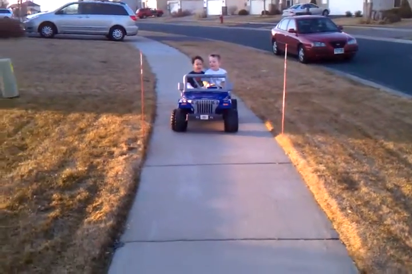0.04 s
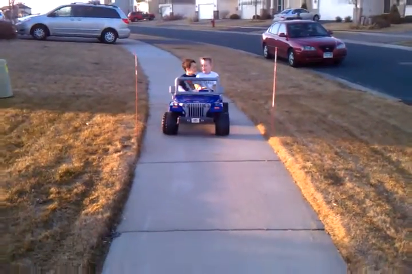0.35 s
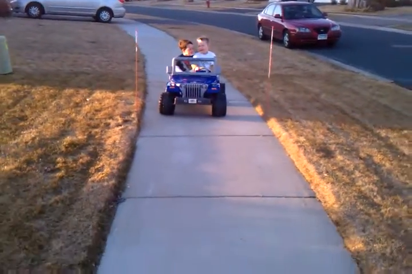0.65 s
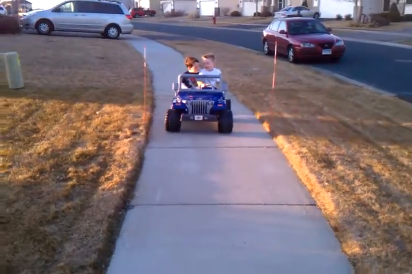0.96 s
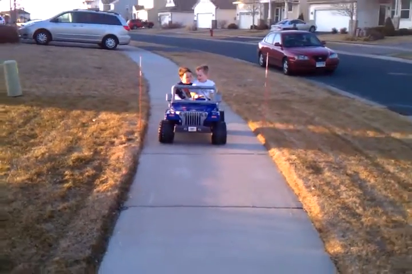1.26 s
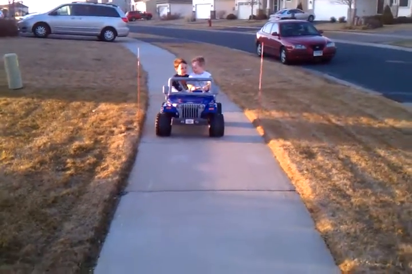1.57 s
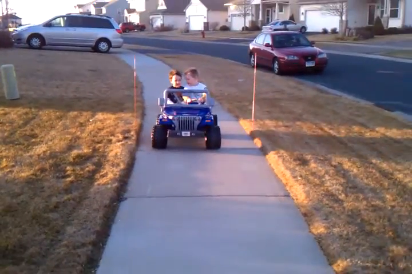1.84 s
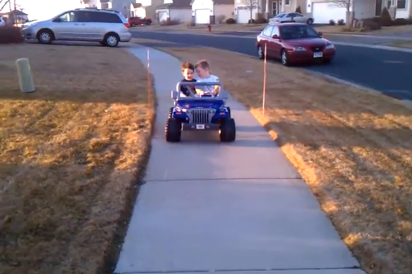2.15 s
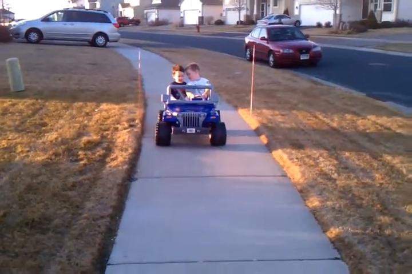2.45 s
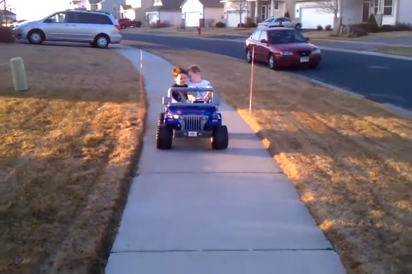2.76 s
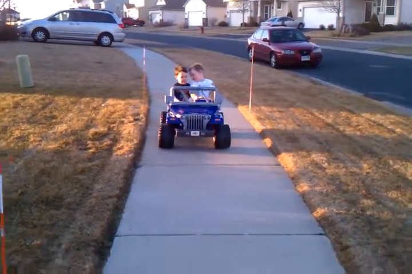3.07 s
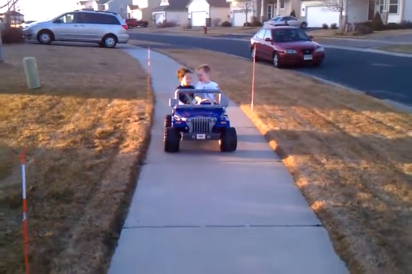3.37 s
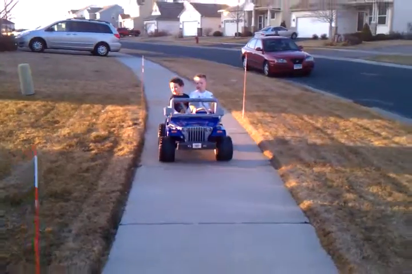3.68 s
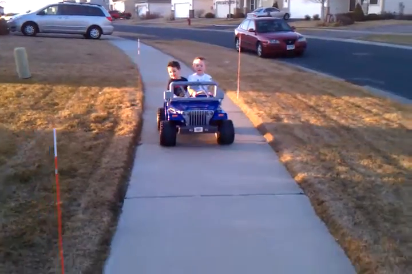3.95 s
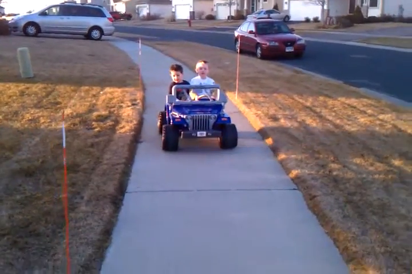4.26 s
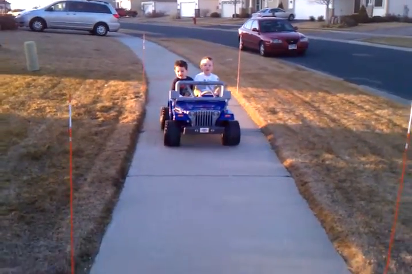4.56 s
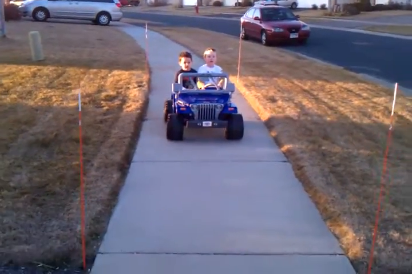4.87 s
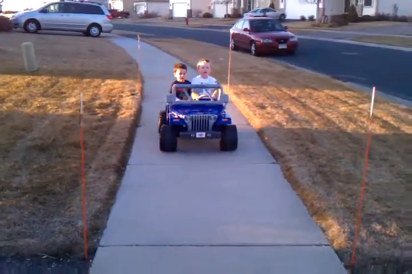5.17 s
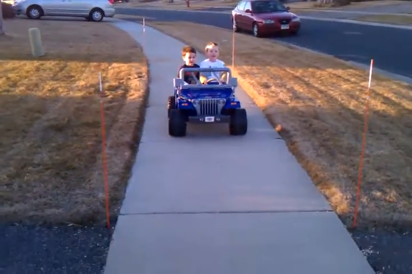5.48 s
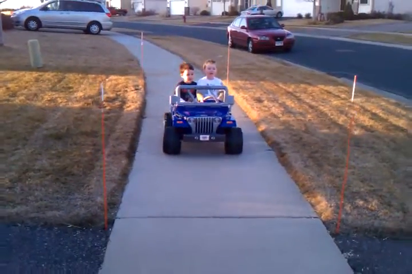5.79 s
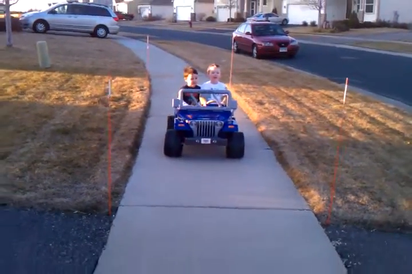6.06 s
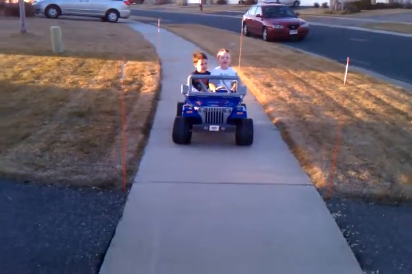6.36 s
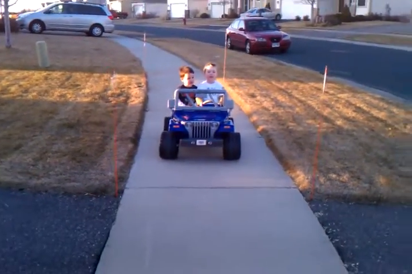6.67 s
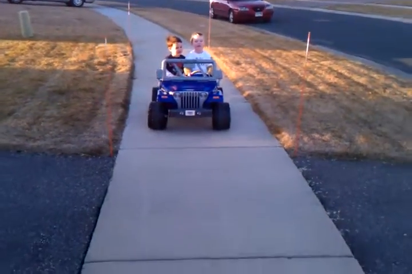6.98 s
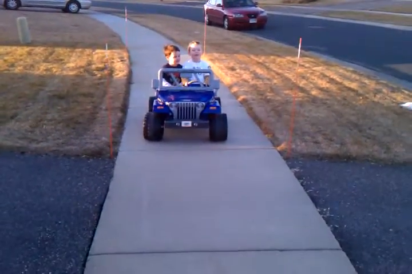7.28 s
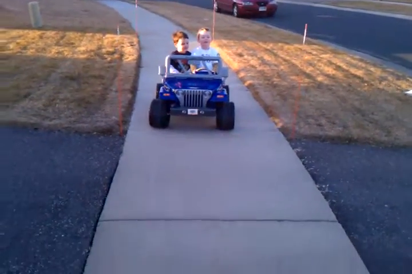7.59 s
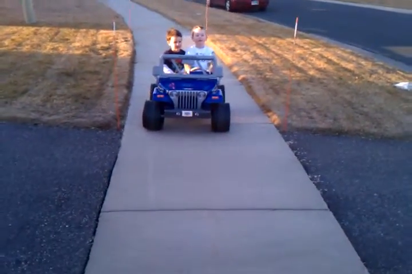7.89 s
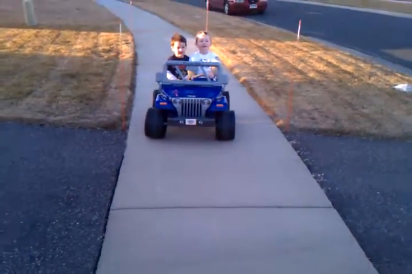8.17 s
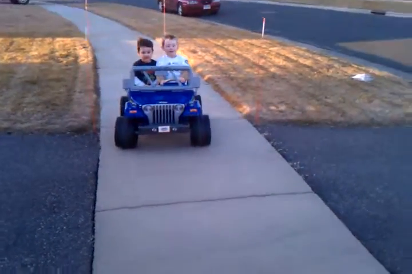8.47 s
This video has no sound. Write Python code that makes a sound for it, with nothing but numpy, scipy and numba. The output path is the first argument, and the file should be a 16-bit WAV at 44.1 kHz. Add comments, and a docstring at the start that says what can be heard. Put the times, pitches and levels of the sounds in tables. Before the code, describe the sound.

A battery ride-on toy car rolls along a concrete pavement throughout, heard on a hand-held microphone outdoors. Its motors and plastic gears make a rough, throbbing whine, while hollow wheels crunch grit and clack irregularly on small stones. Faint, distant traffic lies underneath. From the start until about 3.7 seconds, wind buffets the microphone with low rumbles, sharp slaps and brief hoarse whistles, overloading it and making the car dip in level. A short lull follows, and the car comes through. The gusts return at about 4.4 seconds, and one long gust hums from 5.2 to 5.7 seconds, rising and then falling in pitch. From about 6 seconds the wind eases to occasional soft puffs. The whine and crackling wheels stay in front, growing slightly louder just before the end at about 8.7 seconds.

```python
"""A concrete pavement on a windy day, a hand-held microphone, traffic in the distance. From the start a
battery ride-on toy car creeps closer: two plastic gearboxes whine, hollow wheels crunch grit and clack
on stones. For the first 3.7 s gusts buffet, slap and whistle across the microphone port, overload it
and make the gain control duck the car. After a lull they return, and one long gust hums from 5.2 to
5.7 s. Then the wind eases and leaves the car in front."""
import sys
import numpy as np
from scipy import signal
from scipy.fft import rfft, irfft
from scipy.io import wavfile
from scipy.ndimage import uniform_filter1d
from numba import njit

SR = 44100
rng = np.random.default_rng(int(sys.argv[2]) if len(sys.argv) > 2 else 0)


def to_wav(s):
    """Save 16-bit WAV."""
    ch = np.atleast_2d(s).T  # columns
    pcm = np.round(np.clip(ch, -1, 1) * 32767)  # PCM
    wavfile.write(sys.argv[1], SR, pcm.astype(np.int16))


N = 385037
T = np.arange(N) / SR


def undb(db):
    """Decibels to gain."""
    return 10 ** (np.asarray(db) / 20)


def unit(x):
    """Scale to rms 1."""
    return x / np.sqrt(np.mean(x ** 2))


def curves(table):
    """Each column of a table, joined by straight lines in time."""
    times, *columns = np.transpose(table)
    return [np.interp(T, times, column) for column in columns]


def noise():
    """White noise."""
    return rng.standard_normal(N)


def walk(rate):
    """A random drift of rms 1 that takes a new course rate times a second."""
    return unit(np.interp(T * rate, np.arange(N // 10), rng.standard_normal(N // 10)))


@njit
def svf(x, tuning, damping):
    """State-variable band-pass whose centre and width may move."""
    y, band_state, low_state = np.empty(len(x)), 0., 0.
    for i in range(len(x)):
        v = (band_state + tuning[i] * (x[i] - low_state)) / (1 + tuning[i] * (tuning[i] + damping[i]))
        band_state = 2 * v - band_state
        low_state += 2 * tuning[i] * v
        y[i] = damping[i] * v
    return y


def band(x, hz, width):
    """One resonance, gain 1 at its centre."""
    return svf(x, np.tan(np.pi * hz / SR) * np.ones(N), width / hz * np.ones(N))


def ring(x, modes):
    """A body's resonances, driven together."""
    return sum(undb(db) * band(x, hz, width) for hz, width, db in modes)


# Spectrum of the distant background: (frequency [Hz], relative level [dB])
AMBIENCE_SPECTRUM = [(30, 0), (110, -15), (200, -5), (300, 0), (430, -9), (700, -1), (1000, -9.5),
                     (1700, -12.5), (4000, -15), (6500, -38), (8000, -39.5)]
def ambience():
    """Traffic and wind far off in the neighbourhood, a slowly drifting bed of noise."""
    hz, db = np.transpose(AMBIENCE_SPECTRUM)
    bin_hz = np.arange(N // 2 + 1) * SR / N
    colour = undb(np.interp(np.log(bin_hz + 1), np.log(hz), db))
    return unit(irfft(rfft(noise()) * colour, N)) * undb(-35.5 + walk(0.56))


# Low buffeting right on the microphone: (time [s], level [dB])
BREEZE_LEVELS = [(0, -13.5), (.35, -23), (.55, -16.5), (.75, -17), (1.2, -19.5), (1.31, -26.5), (1.45, -19),
                 (1.67, -22), (1.8, -14.5), (1.99, -22.5), (2.21, -26), (2.35, -19.5), (2.48, -25),
                 (2.78, -19.5), (2.91, -20.5), (3.15, -15), (3.5, -22.5), (3.7, -26.5), (3.85, -42.5),
                 (4.35, -46.5), (4.42, -16.5), (4.52, -26), (4.7, -24.5), (5.05, -29), (5.72, -23),
                 (5.8, -19.5), (5.92, -32.5), (6.06, -28), (6.3, -41), (6.65, -33.5), (6.8, -45.5),
                 (7.1, -38.5), (7.7, -54), (7.95, -28.5), (8.2, -46.5), (8.73, -41)]
def breeze(puff_db=5.5, strongest_db=8.0):
    """Slow eddies thump the microphone in short, uneven puffs; stronger puffs reach higher in pitch."""
    db = curves(BREEZE_LEVELS)[0] + np.minimum(puff_db * walk(40), strongest_db)
    hz = np.clip(68 * undb(0.27 * (db + 29.5)), 30, 400)
    rumble = band(band(noise(), hz, 3.5 * hz), hz, 2.7 * hz)
    return unit(rumble / np.sqrt(hz)) * undb(db)


def gearbox(mesh_hz, wander=.02, jitter=.09, rattle=0.26, throb_db=3.5):
    """Loose plastic teeth strike unevenly and scrape; the level throbs as the load changes."""
    phase = np.cumsum(mesh_hz * (1 + wander * walk(7) + jitter * walk(300))) / SR
    strikes = np.diff(np.floor(phase), prepend=0) * undb(3.8 * walk(500))
    scrape = rattle * noise() * np.exp(-(phase % 1) / 0.59)
    return (strikes + scrape) * undb(-throb_db * walk(25))


# Resonances of the gearbox housing: (frequency [Hz], width [Hz], gain [dB])
HOUSING_MODES = [(330, 82, -4), (520, 83, -1), (749, 130, 2.5), (1260, 280, -2), (2040, 680, -6),
                 (2330, 250, -7.5)]
def gear_whine(teeth):
    """The tooth strikes ring the plastic housing."""
    return unit(ring(teeth, HOUSING_MODES))


# Resonances of the motor mounts: (frequency [Hz], width [Hz], gain [dB])
MOUNT_MODES = [(2110, 150, -5), (2560, 150, 0), (2780, 70, 1), (3220, 110, -1), (3380, 110, -8)]
def motor_whirr(teeth):
    """The same strikes ring the motor mounts in narrow, high bands."""
    return unit(sum(undb(db) * band(band(teeth, hz, width), hz, 3 * width)
                    for hz, width, db in MOUNT_MODES))


def grit(rate, spread_db):
    """Grains of sand crushed at random, about rate a second, a few larger than the rest."""
    hit = rng.random(N) < rate / SR
    size = undb(spread_db * np.minimum(rng.exponential(size=N), 4))
    return unit(hit * size * noise())


# Resonances of a hollow plastic wheel: (frequency [Hz], width [Hz], gain [dB])
WHEEL_MODES = [(1250, 260, 9.5), (2100, 110, 2), (2580, 810, 16.5), (2860, 220, 9), (3166, 260, -1.5),
               (4200, 450, -3.5), (5160, 1100, 1), (5780, 240, -2.5)]
def wheel_crunch():
    """Grit crushed on the concrete rings the wheels; the level flickers."""
    return unit(ring(grit(rate=2800, spread_db=1.5), WHEEL_MODES)) * undb(walk(22) + 2.5 * walk(130))


def ticks(rate=22, spread_db=2.0, decay_s=0.0029):
    """Small stones snap under the treads, each in a brief bright crackle."""
    hit = rng.random(N) < rate / SR
    size = undb(spread_db * np.minimum(rng.exponential(size=N), 2))
    envelope = signal.fftconvolve(hit * size, np.exp(-T[:2000] / decay_s))[:N]
    return envelope * unit(band(grit(rate=25000, spread_db=15.0), 4800, 5000))


# Reflections under the car: (delay [s], gain [dB])
UNDERBODY_BOUNCES = [(.00122, -11.5), (.00153, -4.5)]
def shell(x, sway=0.034):
    """Sound bounces between the body and the pavement; the paths waver as the car rocks."""
    return x + sum(undb(db) * np.interp(T - delay * (1 + sway * walk(3.9)), T, x)
                   for delay, db in UNDERBODY_BOUNCES)


# The car's approach, in relative levels: (time [s], whine [dB], crunch [dB], whirr [dB])
APPROACH_LEVELS = [(0, -27, -26, -27.5), (1.2, -36, -32.5, -31.5), (2, -35, -38.5, -32.5),
                   (3, -26.5, -31.5, -33), (3.6, -25.5, -31.5, -30.5), (4.05, -26, -28, -31),
                   (4.2, -36, -31, -34), (5, -24.5, -27, -30.5), (6.25, -30.5, -29, -32.5),
                   (6.6, -28, -30.5, -32), (7.4, -26.5, -29.5, -31), (7.75, -27, -31.5, -33),
                   (8.1, -29.5, -30, -31), (8.35, -25, -26, -27), (8.73, -23.5, -28.5, -28)]
def car(echo_s=.07, echo_db=-20):
    """Two geared motors and hard wheels under one shell, with a faint echo off the house fronts."""
    whine_db, crunch_db, whirr_db = curves(APPROACH_LEVELS)
    teeth = gearbox(mesh_hz=654) + gearbox(mesh_hz=729)
    whine = gear_whine(teeth) * undb(whine_db)
    whirr = motor_whirr(teeth) * undb(whirr_db)
    rolling = (wheel_crunch() + undb(-2.5) * ticks()) * undb(crunch_db)
    direct = undb(-5) * (shell(whine + rolling + clacks()) + whirr)
    return direct + undb(echo_db) * np.interp(T - echo_s, T, direct, left=0)


# Gusts at the microphone port: (time [s], length [s], level [dB], nominal pitch [Hz])
PORT_GUSTS = [(0.02, 0.013, 5.5, 1153), (0.046, 0.0065, -12.5, 460), (0.064, 0.3, -4, 624),
              (0.361, 0.062, -14.5, 260), (0.427, 0.066, -6, 541), (0.634, 0.067, -4.5, 628),
              (0.712, 0.073, -3, 532), (0.793, 0.1, -5.5, 535), (0.901, 0.039, -8.5, 760),
              (0.975, 0.073, -12.5, 575), (1.062, 0.022, -11.5, 342), (1.099, 0.0054, -12, 405),
              (1.121, 0.01, -8.5, 430), (1.141, 0.074, -14.5, 379), (1.214, 0.025, -7.5, 545),
              (1.251, 0.012, -8, 620), (1.344, 0.075, -4.5, 480), (1.425, 0.067, -5.5, 409),
              (1.502, 0.0085, -9.5, 480), (1.531, 0.032, -10.5, 313), (1.592, 0.006, -7, 419),
              (1.603, 0.033, -15.5, 203), (1.704, 0.04, -10.5, 415), (1.758, 0.013, -10, 228),
              (1.783, 0.062, -12, 323), (1.887, 0.028, -6.5, 504), (1.943, 0.027, -12, 400),
              (2.011, 0.021, -10.5, 460), (2.047, 0.036, -13, 398), (2.123, 0.055, -8.5, 469),
              (2.227, 0.0075, -13.5, 406), (2.264, 0.011, 0.5, 507), (2.276, 0.058, -5, 419),
              (2.341, 0.012, -2, 505), (2.362, 0.041, -10.5, 485), (2.431, 0.02, -10.5, 430),
              (2.492, 0.016, -20, 242), (2.529, 0.034, -15.5, 359), (2.57, 0.036, -7.5, 464),
              (2.648, 0.034, -18.5, 263), (2.738, 0.027, -17.5, 240), (2.784, 0.033, -10.5, 361),
              (2.825, 0.028, -8.5, 524), (2.965, 0.084, -10, 606), (3.068, 0.0085, -9, 613),
              (3.073, 0.071, -10.5, 397), (3.142, 0.069, -4.5, 527), (3.218, 0.081, -3, 693),
              (3.309, 0.027, -7.5, 425), (3.373, 0.03, -15.5, 394), (3.42, 0.023, -4.5, 423),
              (3.444, 0.033, -10, 550), (3.485, 0.045, -5, 610), (3.549, 0.011, -16.5, 366),
              (3.597, 0.0037, -7, 347), (3.677, 0.041, -22, 204), (4.067, 0.009, -26, 141),
              (4.217, 0.023, -31.5, 165), (4.409, 0.054, -7, 633), (4.466, 0.029, -16, 243),
              (4.551, 0.028, -12, 734), (4.639, 0.036, -14, 242), (4.676, 0.014, -8.5, 280),
              (4.725, 0.011, -5, 446), (4.74, 0.078, -8, 523), (4.872, 0.013, -8.5, 554),
              (4.89, 0.03, -19.5, 354), (4.921, 0.027, -6, 680), (4.944, 0.045, -9.5, 696),
              (5.677, 0.024, -15, 314), (5.764, 0.027, -5, 530), (5.786, 0.033, -11, 570),
              (5.826, 0.021, -15, 325), (6.028, 0.03, -21.5, 236), (6.058, 0.025, -14, 340),
              (6.168, 0.048, -23.5, 210), (6.406, 0.037, -24, 194), (6.602, 0.036, -31.5, 147.5),
              (6.683, 0.025, -25, 182), (6.899, 0.017, -25.5, 230), (7.09, 0.016, -32.5, 141.4),
              (7.404, 0.027, -32, 237), (7.909, 0.029, -25.5, 176), (7.965, 0.037, -22.5, 167),
              (8.016, 0.014, -23, 128.4), (8.072, 0.038, -34, 162)]
def gust_flow(rise_s=0.00081, rise_share=0.0071, fall_s=0.0028, growth_db=1.4, weak_db=-15):
    """Envelope, level (dB) and pitch (Hz) of the flow: each gust sets in, grows a little and drops."""
    total = np.full(N, 1e-4)
    db_sum, hz_sum = total * -22, total * 250  # idle flow between the gusts
    for start, length, db, hz in PORT_GUSTS:
        span = slice(max(int((start - .08) * SR), 0), int((start + length + .08) * SR))
        age = T[span] - start
        soft_s = .0005 * max(weak_db - db, 0)  # weak gusts come and go softly
        rise = 1 + np.tanh(age / (rise_s + rise_share * length + soft_s))
        fall = 1 - np.tanh((age - length) / (fall_s + soft_s))
        swell = rise * fall / 4
        total[span] += swell
        db_sum[span] += swell * (db + growth_db * np.clip(age / length - .5, -1, 1))
        hz_sum[span] += swell * hz
    return total, db_sum / total, hz_sum / total


# Roughness of the flow at the port: (time [s], turbulence [ratio, roughly bandwidth / pitch])
PORT_TURBULENCE = [(0, 1.22), (2.7, 1.01), (2.85, 0.9), (3.0, 0.55), (3.1, 0.9), (3.3, 0.73), (3.7, 0.33),
                   (4.42, 0.91), (4.56, 0.35), (4.7, 0.85), (4.85, 1), (4.95, 0.37), (5.78, 0.93),
                   (8.73, 1.4)]
def gusts(droop=0.36, surge_db=1.5, flutter_db=2.5, pitch_wander=0.13):
    """Air sheds eddies off the port: smooth flow whistles, turbulent flow is broad and sputters."""
    swell, db, pitch = gust_flow()
    turbulence = np.clip(curves(PORT_TURBULENCE)[0], .2, 1.4)
    db = db + surge_db * turbulence * walk(60)
    pitch = 0.96 * pitch * (1 - droop * (1 - np.minimum(swell, 1)))  # glides down as a gust dies
    speed_db = flutter_db * turbulence * walk(170)  # quicker flow is both louder and higher
    hz = np.clip(pitch * undb(0.54 * speed_db) * np.exp(pitch_wander * walk(45)), 40, 2500)
    width = 70 + hz * np.clip(turbulence ** 1.1, .05, 3)
    rush = unit(band(band(noise(), hz, width), hz, 150 + 0.35 * hz) / np.sqrt(width))
    skirt = unit(band(band(noise(), hz, hz), hz, 0.97 * hz) / np.sqrt(hz))
    eddies = unit(band(band(noise(), 140, 240), 110, 400))
    # brief sharp crackle, as of wind overloading the microphone
    crackle = unit(band(noise(), 3500, 5600) * undb(12 * np.minimum(walk(420), 2.0)))
    churn = undb(-8) * eddies + undb(-32) * turbulence * crackle
    return swell * undb(db + speed_db) * (rush + undb(-11) * skirt + turbulence * churn)


# Sharp eddies striking the microphone: (time [s], level [dB])
EDDY_SLAPS = [(0.082, -5.5), (0.123, 1), (0.13, -14), (0.148, -5), (0.16, -7), (0.189, -15), (0.204, 0),
              (0.259, -7.5), (0.291, -4), (0.317, -5), (0.347, -7), (0.47, -9), (0.646, -7), (0.68, -12),
              (0.688, -1), (0.76, -14), (0.817, -18), (0.856, -8), (0.925, -11), (1.02, -10.5),
              (1.129, -20), (1.178, -27), (1.4, -16), (1.41, -8), (1.447, -11), (1.594, -21), (1.709, -21),
              (1.897, -11), (2.125, -16), (2.273, -13), (2.346, -17), (2.577, -18), (2.886, -7),
              (3.0728, -7.5), (3.263, -6), (3.493, -15), (4.738, -18.5), (4.878, -17), (6.077, -28)]
def slaps(centre_hz=1300, width_hz=1700, snap_db=-13, half_length_s=.0025):
    """A small, fast eddy hits the port for a few milliseconds with a hard snap."""
    envelope = np.zeros(N)
    for time, db in EDDY_SLAPS:
        span = slice(int((time - .02) * SR), int((time + .02) * SR))
        envelope[span] += undb(db) * np.exp(-((T[span] - time) / half_length_s) ** 2)
    body = unit(band(band(noise(), centre_hz, width_hz), centre_hz, width_hz))
    snap = unit(band(noise(), 3100, 6200))
    return envelope * (body + undb(snap_db) * snap)


# Stones cracking under the wheels, down on the pavement: (time [s], relative level [dB])
STONE_CRACKS = [(0.511, -14), (0.771, -5), (0.882, -7), (1.243, -13), (1.261, -14.5), (1.339, -15),
                (1.657, -16), (1.719, -19), (1.737, -13), (1.771, -13), (1.799, -7.5), (2.092, -18),
                (2.107, -17.5), (2.518, -15.5), (2.629, -16.5), (2.662, -13.5), (2.776, -16.5),
                (2.954, -9.5), (3.023, -8.5), (3.316, -5), (3.636, -12.5), (3.694, -14.5), (3.725, -16),
                (3.768, -8), (3.78, -14), (4.1, -14), (4.114, -11.5), (4.268, -12.5), (4.28, -31),
                (4.395, -13), (4.409, -9), (4.606, -6.5), (4.826, -9.5), (5.125, -15), (5.169, -15),
                (5.904, -14), (6.178, -12.5), (6.444, -13.5), (6.693, -15), (6.772, -9), (7.046, -14.5),
                (7.195, -15), (7.418, -18), (7.451, -15.5), (7.548, -12.5), (7.577, -11.5), (7.586, -10),
                (7.631, -11.5), (7.866, -16), (7.918, -11.5), (8.329, -11.5), (8.36, -21), (8.441, -9.5),
                (8.462, -7.5), (8.513, -12.5), (8.551, -17), (8.659, -18), (8.704, -12)]
def clacks(snap_db=-3, snap_s=0.0078, crumble_db=-22, crumble_s=.03, bright_db=-15):
    """Each stone gives way in a short run of snaps that ring the wheel, then crumbles."""
    envelope = np.zeros(N)
    for time, db in STONE_CRACKS:
        start = int(time * SR)
        age = T[:SR // 10][:N - start]
        crack = undb(snap_db) * np.exp(-(age / snap_s) ** 2)
        crumble = undb(crumble_db) * np.exp(-age / crumble_s)
        envelope[start:start + len(age)] += undb(db) * (crack + crumble)
    snaps = grit(rate=7500, spread_db=5.0)
    ringing = unit(ring(snaps, WHEEL_MODES)) + undb(bright_db) * unit(band(snaps, 2400, 4300))
    local_rms = np.sqrt(uniform_filter1d(ringing ** 2, size=300))
    return envelope * ringing / local_rms


# Smooth jets across the port: (time [s], length [s], level [dB], first pitch [Hz], last pitch [Hz])
PORT_JETS = [(0.912, 0.024, -2.5, 901, 750), (0.982, 0.049, -6.5, 803, 556), (2.876, .02, -2, 1204, 710),
             (2.985, 0.061, -5, 921, 430), (3.281, 0.048, -6.5, 687, 514), (4.554, 0.016, -19, 947, 686),
             (4.96, .028, -10, 666, 830), (5.006, 0.01, -1.5, 770, 930), (5.225, 0.1, -7.5, 640, 539)]
def whistles(edge_s=0.0073, waver=.1, hoarseness=.5):
    """A smooth jet half locks onto the port and sings hoarsely; the note glides with the jet's speed."""
    out = np.zeros(N)
    wobble = np.exp(waver * walk(600))
    lock = 1 + hoarseness * (walk(450) + 1j * walk(450))  # roughens both level and phase
    for start, length, db, first_hz, last_hz in PORT_JETS:
        span = np.abs(T - start - length / 2) < length
        age = T[span] - start
        hz = first_hz * (last_hz / first_hz) ** np.clip(age / length, 0, 1) * wobble[span]
        swell = (1 + np.tanh(age / edge_s)) * (1 - np.tanh((age - length) / edge_s)) / 4
        note = np.imag(lock[span] * np.exp(2j * np.pi * np.cumsum(hz) / SR))
        out[span] += undb(db) * swell * note
    return out


# One long, even gust at the port: (time [s], level [dB], pitch [Hz])
LONG_GUST_COURSE = [(5.175, -70, 560), (5.197, -11, 638), (5.29, -9.5, 613), (5.42, -1, 684),
                    (5.5, -2, 724), (5.56, -2, 944), (5.6, -5, 655), (5.65, -5.5, 600), (5.672, -24, 430),
                    (5.71, -57, 400)]
def long_gust(width_hz=280, skirt_db=-12, flutter_db=3.0):
    """Even flow hums in the port without sputtering, rising in pitch as it swells."""
    db, hz = curves(LONG_GUST_COURSE)
    hum = unit(band(band(noise(), hz, width_hz), hz, 2.03 * width_hz))
    skirt = unit(band(band(noise(), 0.43 * hz, 0.53 * hz), 0.54 * hz, 0.51 * hz))
    return (hum + undb(skirt_db) * skirt) * undb(db + flutter_db * walk(60))


def scene():
    """One microphone: the car along the pavement, wind right at the port, traffic far behind."""
    return (car() + gusts() + long_gust() + whistles() + slaps() + breeze() + ambience())[None]


@njit
def follow(x, attack, release):
    """Level follower that rises quickly and falls slowly."""
    y, level = np.empty(len(x)), x[:2000].max()
    for i in range(len(x)):
        level += (x[i] - level) * (attack if x[i] > level else release)
        y[i] = level
    return y


def record(dry, ceiling=0.66, knee=0.12, lag_s=.004, attack_s=.004, release_s=0.16, top_hz=7450):
    """The microphone clips, the gain control ducks just after each loud moment, and the top is cut."""
    clipped = np.clip(dry[0], -ceiling, ceiling)
    loudness = np.sqrt(np.abs(uniform_filter1d(clipped ** 2, size=220)))
    held = follow(loudness, 1 / (attack_s * SR), 1 / (release_s * SR))
    gain = np.minimum(1, knee / np.interp(T - lag_s, T, held))
    low_pass = signal.ellip(7, .3, 60, top_hz, fs=SR, output="sos")
    return signal.sosfilt(low_pass, clipped * gain)[None]


dry = scene()
out = record(dry)
to_wav(out)
```